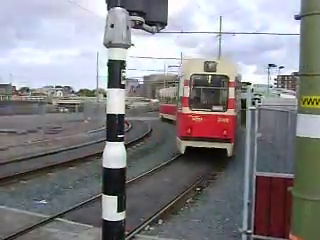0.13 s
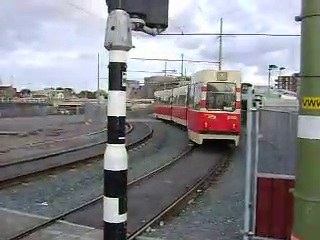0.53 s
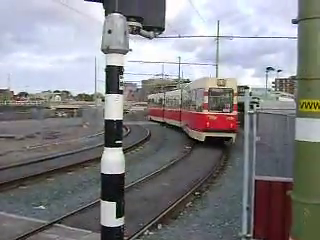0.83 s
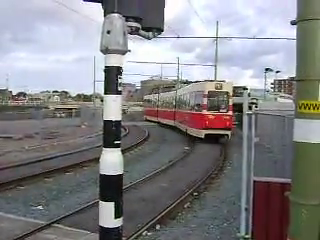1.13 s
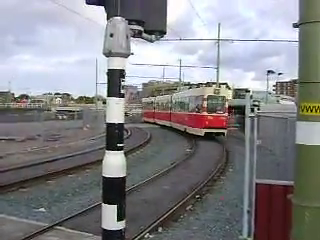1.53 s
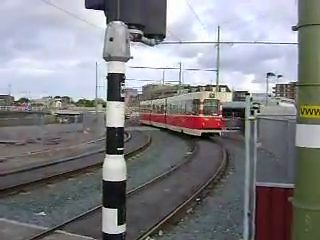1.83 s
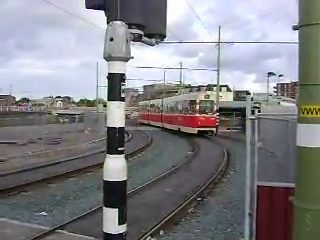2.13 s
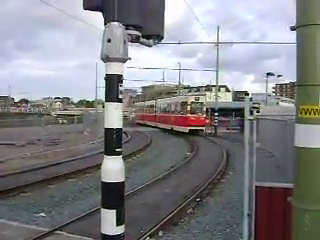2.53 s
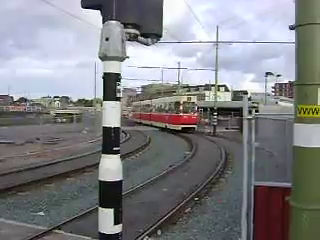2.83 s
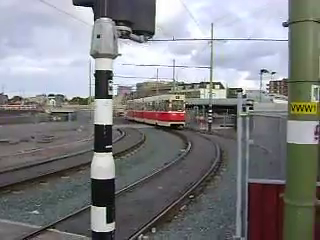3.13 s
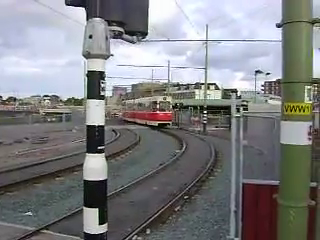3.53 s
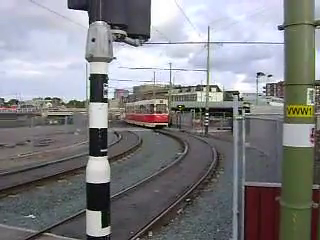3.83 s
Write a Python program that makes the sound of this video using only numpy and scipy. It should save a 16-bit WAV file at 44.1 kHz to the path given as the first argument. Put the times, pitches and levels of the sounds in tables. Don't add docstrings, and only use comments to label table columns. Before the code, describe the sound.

A tram's wheels squeal in a loud, throbbing high tone around a curve, then recede.

```python
import sys
import numpy as np
from scipy import signal
from scipy.fft import rfft, irfft
from scipy.io import wavfile
from scipy.ndimage import uniform_filter1d

SR = 44100
rng = np.random.default_rng(int(sys.argv[2]) if len(sys.argv) > 2 else 0)


def voltage_ratio(level):
    return 10 ** (np.asarray(level, float) / 20)


def wav_out(sig):
    wavfile.write(sys.argv[1], SR, np.round(np.clip(np.atleast_2d(sig).T, -1, 1) * 32767).astype(np.int16))


N = 176400
T = np.arange(N) / SR


def unit(x):
    return x / np.sqrt(np.mean(x ** 2))


def curve(rows):
    return np.interp(T, *np.array(rows).T)


def bumps(times, gains, spreads_s):
    coarse_t = np.arange(0, N + 32, 32) / SR
    total = np.exp(-.5 * ((coarse_t[:, None] - times) / spreads_s) ** 2) @ gains
    return signal.resample_poly(total, 32, 1, padtype="edge")[:N]


def walk(rate):
    k = int(SR / rate)
    once = uniform_filter1d(rng.standard_normal(N), k)
    return unit(uniform_filter1d(once, k))


def colour(points, flicker_db=0., rate=10.):
    hz, pts = np.arange(1, N // 2 + 2) * SR / N, np.array(points)
    shape_db = np.interp(np.log(hz), np.log(pts[:, 0]), pts[:, 1])
    spec = rfft(rng.standard_normal(N)) * voltage_ratio(shape_db)
    band = np.clip(np.round(2 * np.log2(hz / 60)), 0, 13)
    return unit(sum(irfft(spec * (band == b), N) * voltage_ratio(flicker_db * walk(rate)) for b in range(14)))


def ring(x, hz, width_hz):
    pole = np.exp((2j * np.pi * hz - np.pi * width_hz) / SR)
    return signal.lfilter([1], [1, -pole], x).imag


def noisy_ring(hz, width_hz):
    return unit(ring(rng.standard_normal(N), hz, width_hz))


# [f/Hz, level/dB per Hz]
TOWN_COLOUR = [(30, -6.5), (230, -14.5), (350, -6.5), (750, -6), (1300, -3.5), (2000, -22), (3600, -17.5),
               (6000, -32.5)]
# [f/Hz, level/dB per Hz]
WIND_COLOUR = [(20, -7.5), (50, -5), (150, -1.5), (300, -6.5), (700, -8), (2000, -46.5)]
# [t/s, level/dB, length/s]
PUFFS = [
    (0.874, -40, 0.074),
    (1.386, -46, 0.11),
    (2.892, -44, 0.085),
    (3.202, -45, 0.074),
    (3.287, -38, 0.019),
    (3.835, -46.5, 0.081),
]


def air():
    s, db, length = np.array(PUFFS).T
    gust = bumps(s, voltage_ratio(db), 0.47 * length) + voltage_ratio(-54)
    wind = colour(WIND_COLOUR, 2., 15.)
    return voltage_ratio(-48) * colour(TOWN_COLOUR, 0.99, 18) + gust * wind


# [t/s, level/dB]
TICKS = [(2.655, -38), (2.672, -31), (2.706, -33.5), (2.75, -40), (3.212, -45.5), (3.277, -45), (3.29, -42),
         (3.303, -43.5), (3.315, -43), (3.523, -39), (3.541, -36), (3.548, -40)]


def ticks():
    s, db = np.array(TICKS).T
    return bumps(s, voltage_ratio(db), .0022) * colour([(300, -13), (2500, -2), (4000, 4), (6000, -1.5)])


# [t/s, level/dB, f/Hz]
KNOCKS = [
    (1.668, -31, 600),
    (1.88, -32.5, 595),
    (1.949, -28.5, 632),
    (2.411, -46, 1030),
    (2.719, -31, 568),
    (2.86, -37, 500),
    (3.518, -36, 720),
]


def knocks():
    t60_s, attack_s = 0.21, .008
    out = np.zeros(N)
    for s, db, hz in KNOCKS:
        age = np.maximum(T - s, 0)
        out += voltage_ratio(db - 60 * age / t60_s) * (1 - np.exp(-age / attack_s)) * noisy_ring(hz, 45)
    return out


# [t/s, level/dB]
ROLLING = [(0, -29.5), (.3, -32.5), (.6, -33.5), (1.3, -35.5), (1.6, -37.5), (2, -36.5), (2.1, -39.5),
           (2.6, -42.5), (2.8, -39.5), (2.95, -45), (3.02, -46.5), (4, -59.5)]
# [f/Hz, level/dB per Hz]
RUMBLE_COLOUR = [(40, -20), (300, -7), (450, 0.5), (800, -6.5), (970, -3.5), (1300, -12), (2000, -14.5),
                 (6000, -26)]


def rolling():
    rumble = voltage_ratio(curve(ROLLING) - 1.23) * colour(RUMBLE_COLOUR, 1.0, 9.7)
    idle = voltage_ratio(-51) + bumps(np.array([1.9, 2.76]), voltage_ratio([-38, -44]), 0.07)
    return rumble + idle * noisy_ring(1594, 47) + voltage_ratio(-60) * noisy_ring(2835, 25)


# [t/s, level/dB, spread/s, f/Hz]
WHISTLES = [
    (.23, -35, .025, 2197),
    (.3, -36, .022, 2197),
    (.213, -23, .018, 3790),
    (.21, -39, .025, 2531),
    (2.08, -43, .11, 2812),
]


def whistles():
    out = np.zeros(N)
    for s, db, spread, hz in WHISTLES:
        swell = voltage_ratio(db + 1.7 * walk(28)) * np.exp(-.5 * ((T - s) / spread) ** 2)
        out += swell * np.sin(2 * np.pi * hz * T + 0.41 * walk(28))
    return out


# [t/s, level/dB]
PRESSURE = [(0, -40), (.8, -32), (1.25, -37), (1.7, -34.5), (2.0, -45), (2.4, -40), (2.68, -44.5),
            (2.74, -59), (3.5, -60.5), (3.7, -51.5), (4, -50.5)]
WHEEL_HZ = [2531, 2820, 3252, 3274, 3440, 3539, 3786, 3984, 4835, 4932, 5290]
# [width/Hz, level/dB]
WHEEL = [(20, -22.5), (14, -19.5), (24, -19.5), (16.7, -6.5), (35, -18.5), (13.9, -13.5), (30, -11.5),
         (20, -19.5), (17, -11.5), (14, -30.5), (33, -15.5)]
# [f/Hz, level/dB per Hz]
SCRAPE_COLOUR = [(2400, -38.5), (2900, -10.5), (3150, 1), (3900, -3.5), (4400, -7.5), (5200, -5),
                 (5800, -6), (6050, -20)]


def scrape(grit, s, grind_db):
    modes = np.zeros(N)
    for hz, (width_hz, db) in zip(WHEEL_HZ, WHEEL):
        modes += voltage_ratio(db - 1.0) * unit(ring(grit, hz, width_hz)) * voltage_ratio(4.0 * walk(15))
    hiss = voltage_ratio(0.84) * colour(SCRAPE_COLOUR, 2.2, 9.9) * voltage_ratio(2.5 * walk(340))
    push = np.hypot(bumps(s, voltage_ratio(grind_db - 5.5), 0.02), voltage_ratio(curve(PRESSURE)))
    return push * (modes + hiss)


# [t/s, scrape level/dB, second overtone/dB, third overtone/dB]
SCRAPES = [(0.023, -34.5, -43, -54), (0.062, -31.5, -54, -53.5), (0.116, -26, -46, -52.5),
           (0.164, -40, -60.5, -57.5), (0.218, -17, -31.5, -30), (0.296, -23, -28.5, -30.5),
           (0.351, -33, -41, -43), (0.403, -29.5, -36.5, -48), (0.449, -54, -46, -57.5),
           (0.497, -23.5, -43, -39), (0.553, -18, -38, -29), (0.617, -23.5, -35.5, -31.5),
           (0.663, -30, -37.5, -49), (0.706, -27, -57.5, -27), (0.756, -26.5, -35, -28),
           (0.795, -21.5, -59, -22.5), (0.835, -24.5, -22.5, -29), (0.881, -19.5, -23, -25),
           (0.928, -26, -35, -32), (0.991, -25, -32.5, -35.5), (1.078, -35.5, -28.5, -27),
           (1.125, -52, -41.5, -59), (1.178, -21.5, -36.5, -28), (1.235, -28, -41, -33),
           (1.286, -27.5, -33, -34.5), (1.33, -43, -53, -40), (1.382, -24, -28.5, -31),
           (1.427, -32.5, -54, -38.5), (1.469, -23, -34, -31.5), (1.513, -40, -50.6, -60),
               (1.551, -48.5, -48, -34), (1.604, -27, -48, -42.5), (1.672, -19.5, -47, -39),
               (1.728, -28, -61, -38.5), (1.768, -26.5, -34.5, -47.5), (1.844, -30, -45, -56),
               (1.938, -43, -52, -69), (1.988, -50, -57, -71), (2.032, -55.5, -55, -67),
               (2.073, -49, -59, -45.5), (2.124, -39, -39.5, -48.5), (2.198, -43, -46.5, -42),
               (2.275, -45, -39, -44), (2.325, -30.5, -37, -31.5), (2.391, -24, -29.5, -27),
               (2.452, -27.5, -40, -26), (2.494, -37, -31, -37), (2.563, -32.5, -53, -40),
               (2.608, -49, -58, -44), (2.671, -51, -54, -61)]
# [t/s, rasp level/dB, third overtone/dB, spread/s]
RASPS = [
    (.501, -28.5, -15.5, 0.008),
    (2.372, -27, -40, 0.0055),
    (3.674, -46, -35.5, 0.017),
    (3.75, -32, -28, 0.0096),
    (3.81, -33, -31, 0.0097),
    (3.848, -44, -60, 0.013),
    (3.908, -34, -34, 0.011),
    (3.974, -36, -35.5, .013),
]


def flange(phase):
    s, grind_db, second_db, third_db = np.array(SCRAPES).T
    bite_s, rasp_db, bite_third_db, spread = np.array(RASPS).T
    grit = rng.standard_normal(N) * voltage_ratio(4.8 * walk(450))
    scraping = scrape(grit, s, grind_db)

    swell = bumps(s, voltage_ratio(third_db + 3.0), 0.023)
    bed = bumps(np.array([3.78, 3.94]), voltage_ratio([-44, -46]), 0.047)
    third = swell + bumps(bite_s, voltage_ratio(bite_third_db), spread)
    third = third * np.sin(3 * phase + 0.71 * walk(44)) * voltage_ratio(2.5 * walk(110))
    third += bed * np.sin(3 * phase) + voltage_ratio(-14) * swell * unit(ring(grit, 4660, 86))
    fourth = voltage_ratio(-25) * swell * np.sin(4 * phase + 1.3 * walk(45))

    late = bumps(np.array([2.75, 2.95, 3.64, 3.9]), voltage_ratio([-57, -60, -52, -49]), .09)
    second = bumps(s, voltage_ratio(second_db - 0.8), 0.033) + late
    second = second * np.sin(2 * phase + 0.66 * walk(25)) * voltage_ratio(2.6 * walk(31))

    rasp = unit(ring(ring(ring(grit, 4800, 570), 4640, 1000), 5600, 600))
    bite = voltage_ratio(-5.0) * bed + voltage_ratio(-11.0) * swell + bumps(bite_s, voltage_ratio(rasp_db), spread)
    return scraping + second + third + fourth + bite * rasp


# [crest t/s, peak level/dB, spread/s]
SWELLS = [(0.016, -13.5, 0.012), (0.048, -11, 0.012), (0.097, -15.5, 0.018), (0.149, -8.3, 0.025),
          (0.202, -12, 0.015), (0.232, -7, 0.017), (0.272, -10.5, 0.0075), (0.292, -11, 0.0074),
          (0.322, -7.2, 0.012), (0.379, -9.8, 0.017), (0.414, -16, 0.0071), (0.44, -14, 0.022),
          (0.503, -4.5, 0.013), (0.585, -10.0, 0.026), (0.631, -20.5, 0.0049), (0.653, -12.5, 0.0075),
          (0.695, -6, 0.019), (0.776, -6.5, 0.025), (0.84, -13.5, 0.0048), (0.868, -11.1, 0.014),
          (0.903, -13.5, 0.0053), (0.956, -9.5, 0.025), (0.988, -17.5, 0.033), (1.048, -11.5, 0.016),
          (1.084, -16, 0.011), (1.13, -17.5, 0.017), (1.179, -14, 0.021), (1.238, -25.5, 0.008),
          (1.279, -13.9, 0.043), (1.347, -13.5, 0.011), (1.397, -15.4, 0.016), (1.438, -16.5, 0.0091),
          (1.478, -12.9, 0.023), (1.536, -13.5, 0.011), (1.573, -10.5, 0.019),
          (1.625, -17, 0.009), (1.66, -12, 0.024), (1.749, -18, 0.024), (1.79, -18, 0.0038),
              (1.82, -32, 0.027), (1.839, -30, 0.0045), (1.902, -26.5, 0.0049), (1.982, -31, 0.068),
              (2.072, -17.5, 0.019), (2.114, -23.5, 0.0043), (2.149, -15.5, 0.019), (2.188, -18, 0.019),
              (2.278, -12.9, 0.028), (2.345, -15, 0.014), (2.407, -17.0, 0.025), (2.474, -14.5, 0.017),
              (2.515, -22.9, 0.0089), (2.551, -19.5, 0.018), (2.588, -17.3, 0.026), (2.662, -22, 0.014),
              (2.726, -32.5, 0.025), (3.489, -31.5, 0.033), (3.577, -20.4, 0.02), (3.668, -18.4, 0.025),
              (3.708, -30.5, 0.02), (3.751, -32, 0.0092), (3.778, -22.2, 0.033), (3.836, -27.3, 0.011),
              (3.892, -22.5, 0.016), (3.94, -28, 0.01), (3.983, -20, 0.017)]
SLIPS = [.062, .157, .308, .432, .61, .66, .912, 2.135, 2.425]


def squeal(phase):
    slip_rad, slip_s = 2.8, .01
    s, db, spread = np.array(SWELLS).T
    body = bumps(s, voltage_ratio(db), spread)
    for at in SLIPS:
        slipped = .5 + .5 * np.tanh((T - at) / slip_s)
        body = body * (1 + (np.exp(1j * slip_rad) - 1) * slipped)
    halo = voltage_ratio(-25) * np.abs(body) * noisy_ring(1539, 88)
    return (body * np.exp(1j * (phase + .32 * walk(33)))).imag + halo


# [t/s, f/Hz]
PITCH = [(0, 1576.5), (.5, 1575.5), (.9, 1575.5), (1.65, 1576.3), (1.78, 1568), (1.9, 1564), (2.02, 1575),
         (2.8, 1576), (3.4, 1580), (4, 1579)]


def scene():
    phase = 2 * np.pi * np.cumsum(curve(PITCH)) / SR
    wheels = squeal(phase) + flange(phase) + whistles()
    return (wheels + rolling() + knocks() + ticks() + air())[None]


# [t/s, level/dB]
NICKS = [
    (.4963, -29),
    (.5033, -46),
    (.5045, -21),
    (.5058, -24),
    (.5071, -36),
    (.509, -47),
]


def overload_nicks():
    s, db = np.array(NICKS).T
    return np.bincount((s * SR).astype(int), voltage_ratio(db), N)


def band_limit(x):
    return signal.sosfilt(signal.butter(12, 15900, fs=SR, output="sos"), x)


def record(dry):
    dull = np.clip(dry, -.68, .68)
    dull = signal.sosfilt(signal.butter(10, 4947, fs=SR, output="sos"), dull)
    dull = signal.sosfilt(signal.ellip(8, .5, 70, 6360, fs=SR, output="sos"), dull)
    return band_limit(dull + overload_nicks())


dry = scene()
out = record(dry)
wav_out(out)
```